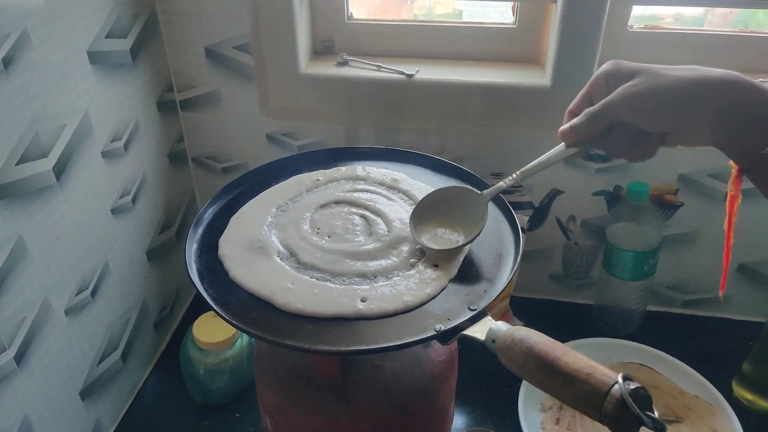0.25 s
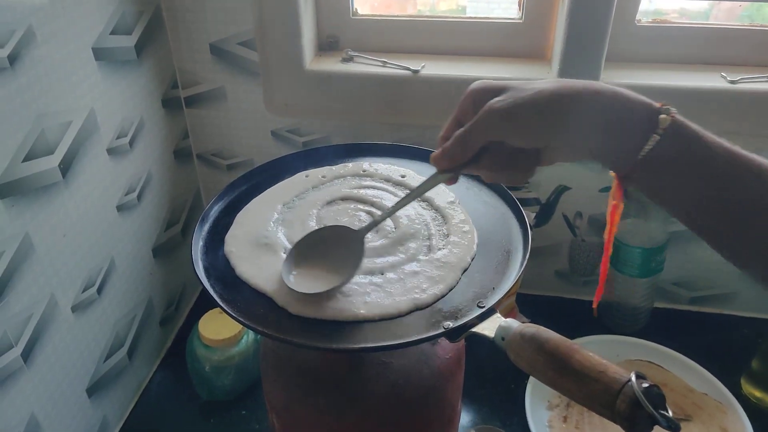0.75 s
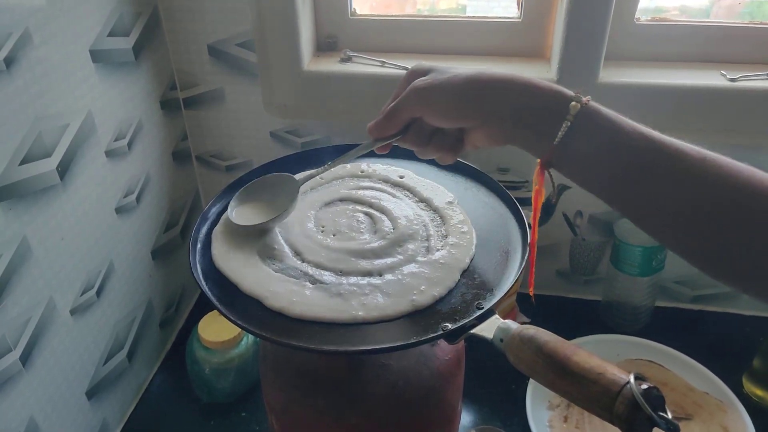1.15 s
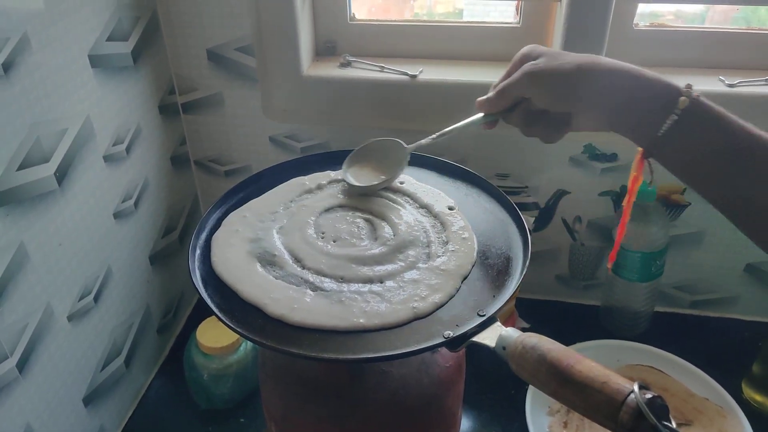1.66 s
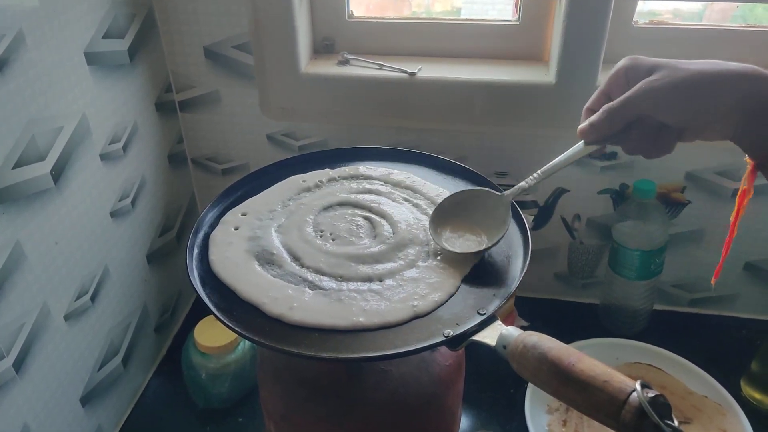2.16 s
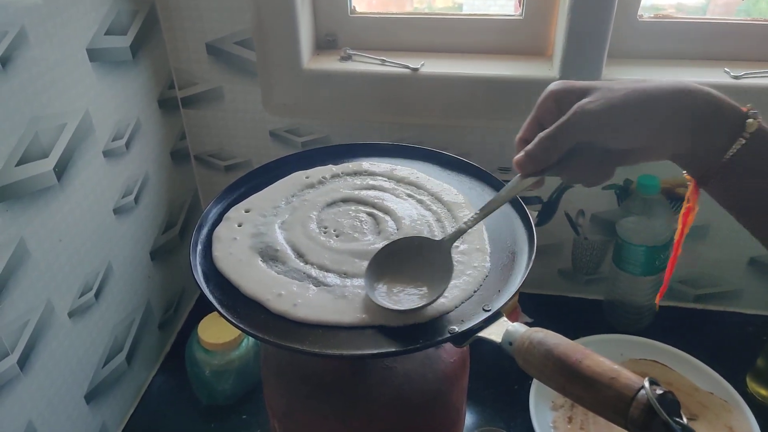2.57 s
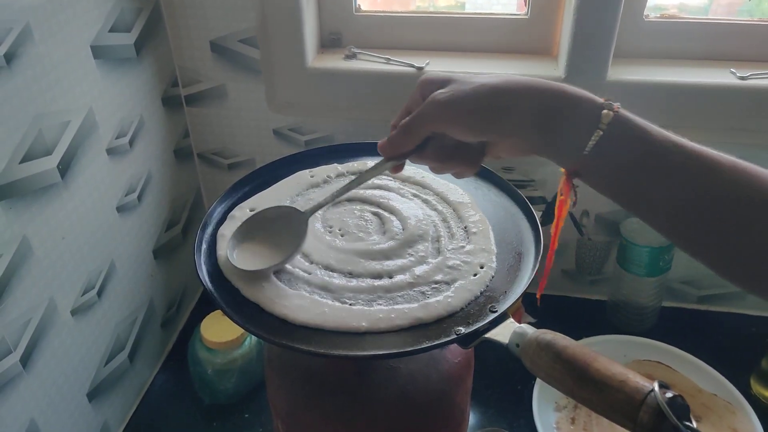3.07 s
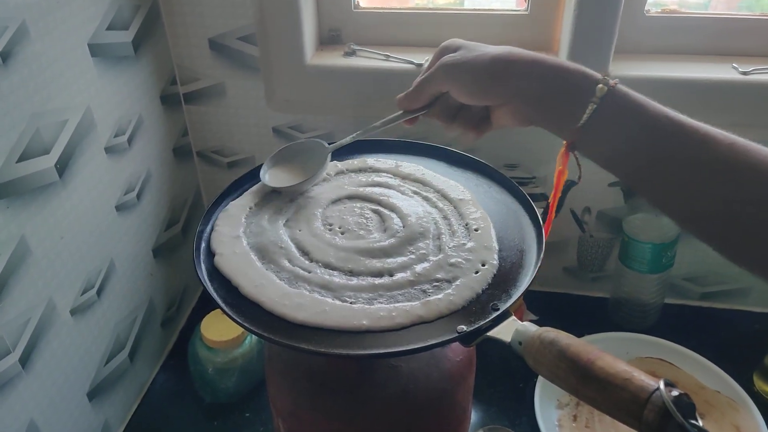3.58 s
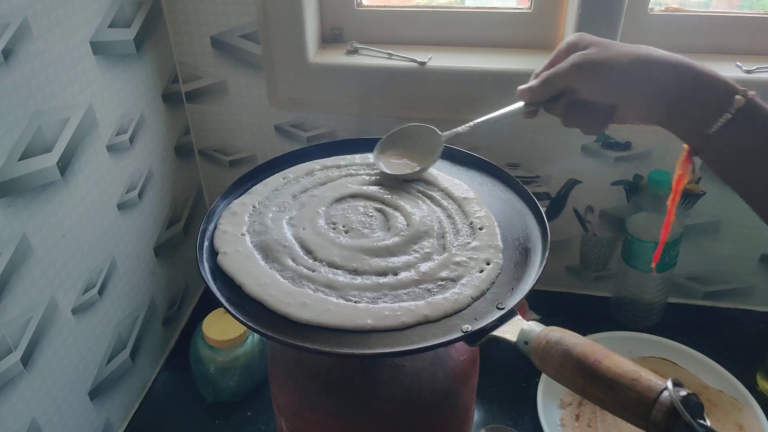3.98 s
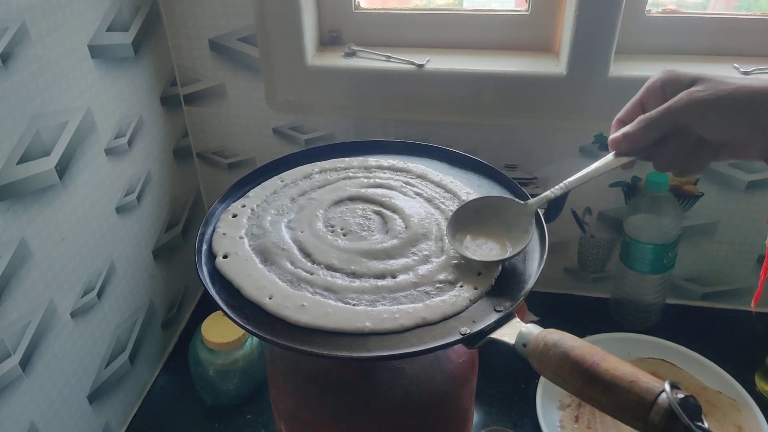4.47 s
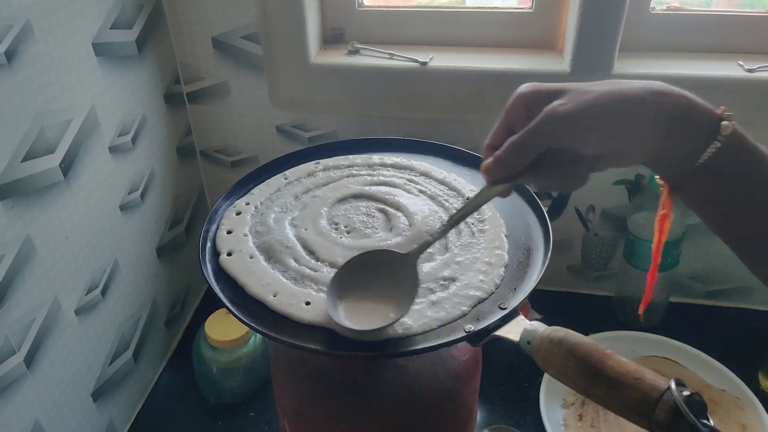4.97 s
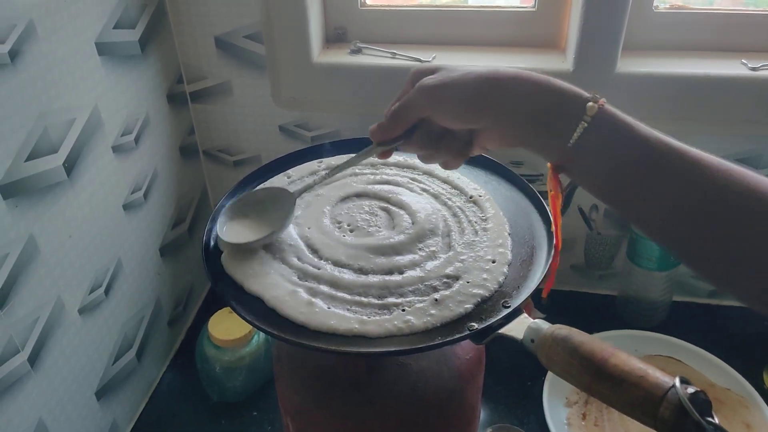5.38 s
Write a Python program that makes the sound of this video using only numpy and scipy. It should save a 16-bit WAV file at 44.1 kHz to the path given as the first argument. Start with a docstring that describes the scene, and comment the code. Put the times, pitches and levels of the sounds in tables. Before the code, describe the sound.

Steady crisp frying hiss swells and dips as batter is spread in circles, with faint ladle scrapes, tiny spits and a low griddle judder.

```python
"""Batter on a hot griddle

In a small kitchen, batter sizzles while a steel ladle spreads it in circles. Random bursts in four pitch
ranges, over hissing noise, make the steam bubbles; wet batter on bare iron brings surges, then bright jets.
Blisters spit as short puffs of noise. The ladle rubs, squeaks and smears as clicks and wavering tones, and
twice sets the griddle juddering on the stove through resonators. A low rumble of filtered noise lies behind."""
import sys
import numpy as np
from scipy.fft import rfft, irfft
from scipy.io import wavfile
from scipy.ndimage import map_coordinates

SR = 44100
rng = np.random.default_rng(int(sys.argv[2]) if len(sys.argv) > 2 else 0)


def file_out(sig):
    """Save sig as 16-bit WAV at sys.argv[1]."""
    # one column per channel
    cols = np.atleast_2d(sig).T
    # limit, then scale
    lim = np.clip(cols, -1, 1)
    pcm = np.round(lim * 32767).astype(np.int16)
    wavfile.write(sys.argv[1], SR, pcm)


N = 248503
TIME = np.arange(N) / SR   # s
FFT_SIZE = 2 ** 19
HZ = np.maximum(np.fft.rfftfreq(FFT_SIZE, 1 / SR), 1)

# How hard the batter fries: t/s, sizzle level/dB
FRYING = [(0.0, -33), (0.47, -33.5), (0.62, -29.5), (0.84, -34.5), (1.18, -40.5), (1.48, -37.5),
          (1.62, -42), (1.76, -35), (1.96, -34.5), (2.37, -29.5), (2.59, -31.5), (2.74, -28.5),
          (3.1, -37.5), (3.17, -34), (3.34, -36), (4.01, -33.5), (4.74, -36), (4.77, -32.5), (5.01, -28),
          (5.38, -37.5), (5.55, -37), (5.6, -44)]
# Frequencies that part the bubble sizes, large to fine: f/Hz
SIZE_EDGES_HZ = [3000, 4300, 6000]
# Bubbles, large to fine spray: level/dB against the sizzle, share of the frying swing followed,
# share of a surge (negative sinks), loss under a smear/dB, steam level/dB against the shared bursts
BUBBLE_SIZES = [(-9.5, 0.93, -0.34, 1, 2.5), (-8.5, 0.99, 0.95, 3, 1), (-2.5, 1.02, -0.28, 0.5, -0.5),
                (-6.5, 0.79, 0.2, 6.5, -4)]
# Once a circle the ladle pushes wet batter on to bare iron: t/s, length/s, swell/dB before each size's
# share, wait for the steam jet/s, jet level/dB
SURGES = [(0.487, 0.25, 5.5, 0.14, -34.5), (2.64, 0.15, 3, 0.084, -35), (4.794, 0.22, 4, 0.25, -40.5)]
STEADY_DB = -33   # sizzle at an ordinary pace
SURGE_EDGE_S = 0.096   # the bubbles swell gently
SMOTHER_LAG_S, SMOTHER_S, SMOTHER_EDGE_S = 0.13, 0.13, 0.04   # a smear soon seals the pores


def sizzle(bursts_per_s=6500, spread_db=3.0, own_db=-4.0, flutter_db=0.41, own_flutter_db=0.59, wander_db=0.42):
    """Steam bubbles burst all round the batter's edge over a hiss; harder frying means more of them."""
    frying_db = np.interp(TIME, *np.transpose(FRYING))
    swing = frying_db - STEADY_DB + wander_db * drift(18)
    surge = sum(db * pressed(s, length, SURGE_EDGE_S) for s, length, db, *jet in SURGES)
    smothered = sum(pressed(s + SMOTHER_LAG_S, SMOTHER_S, SMOTHER_EDGE_S) for s, length, db in SMEARS)

    per_s = bursts_per_s * from_db(swing - swing.mean())
    evened = np.sqrt(per_s.mean() / per_s)   # crowding alone does not raise the level
    shared_bursts = evened * np.array([grains(per_s, spread_db) for channel in range(2)])
    steam = rng.standard_normal((2, N))
    colour = sizzle_colour()

    # each size of bubble sounds in its own range, the smaller the higher and crisper
    above_edge = [1] + [1 / (1 + (edge / HZ) ** 24) for edge in SIZE_EDGES_HZ] + [0]
    out = 0
    for k, (size_db, follows, surges, lost_db, steam_db) in enumerate(BUBBLE_SIZES):
        own_bursts = evened * np.array([grains(per_s / 2, spread_db) for channel in range(2)])
        fizz = shared_bursts + from_db(own_db) * own_bursts + from_db(steam_db) * steam
        band = above_edge[k] - above_edge[k + 1]
        bubbles = rms_one(filtered(fizz, colour * band))
        level = STEADY_DB + size_db + follows * swing + surges * surge - lost_db * smothered
        out = out + bubbles * from_db(level + own_flutter_db * drift(35))
    return out * from_db(flutter_db * drift(70))   # bubbles come in clusters


# Colour of the bursts: f/Hz, relative level/dB per Hz
SIZZLE = [(250, -46.5), (700, -22), (1300, -18), (2250, -8.5), (3100, -6), (3650, -5), (4270, -10.5),
          (4800, -4), (5100, -2.5), (5900, -12.5), (8000, -14.5), (12600, -18), (14400, -16)]
# Where the sizzle sits between the microphones: f/Hz, left minus right level/dB
SIZZLE_PAN = [(1200, 5), (2400, 1.2), (3200, 3), (4300, 3), (4850, 4.5), (5500, -3), (6200, -3), (7400, 0),
              (9500, 3), (12500, 1), (15000, 0.5)]
# Thin rings that the bursts draw from the iron plate: f/Hz, width/Hz, level/dB against the plain sizzle
PLATE = [(790, 40, -2), (1054, 27, 2), (1201, 18, 3), (1415, 22, 1), (1510, 110, -1), (1973, 48, -3),
         (2659, 60, -4), (3440, 55, -4), (3940, 40, -2), (4829, 50, -3)]
# Reflections from the tiled corner and window: delay at left t/s, delay at right t/s, level/dB
ECHOES = [(.0037, 0.0034, -20), (.0069, 0.0053, -10), (0.0102, 0.0093, -12), (0.0162, 0.02, -9)]


def sizzle_colour(wall_cut_hz=5500):
    """Left and right response to a burst: broad humps, the plate's thin rings and the near walls."""
    rings = sum(from_db(db) ** 2 / (1 + (2 * (HZ - hz) / width) ** 2) for hz, width, db in PLATE)
    echoes = 0
    for left, right, db in ECHOES:
        delay = np.array([[left], [right]])
        echoes = echoes + from_db(db) * np.exp(-2j * np.pi * HZ * delay)
    walls = 1 + echoes / (1 + (HZ / wall_cut_hz) ** 2)   # the spread-out source blurs the highest echoes
    return from_db(at_hz(SIZZLE)) * np.sqrt(1 + rings) * walls * panned(at_hz(SIZZLE_PAN))


# Colour of the steam jets: f/Hz, relative level/dB per Hz
JET = [(5000, -28), (9000, -2), (13000, -2), (15000, 1)]
JET_S = 0.13   # length of a jet


def jets():
    """Late in a surge or just after it, trapped steam escapes through pinholes in a very bright hiss."""
    hiss = rms_one(filtered(rng.standard_normal((2, N)), from_db(at_hz(JET))))
    releases = [(s + wait, JET_S, db) for s, length, swell_db, wait, db in SURGES]
    return hiss * strokes(releases, edge_s=0.036)


# Large blisters that spit: t/s, starting level/dB before the overall SPIT_DB
SPITS = [(3.1887, -11), (5.096, -17), (5.163, -13), (5.28, -15), (5.395, -17)]
SPIT_DB = -6   # applied to large and small spits alike
SPIT_S = 0.001   # time for a puff to fall to 1/e
SPIT_LOW_HZ, SPIT_HIGH_HZ = 3800, 8000
SMALL_SPITS_PER_S, SMALL_SPIT_DB, SMALL_SPIT_SPREAD_DB = 4, -21, 1   # levels before SPIT_DB


def spits():
    """A blister lets its steam go in a bright puff of about a millisecond; small ones come at random."""
    brightness = np.sqrt((1 + (SPIT_LOW_HZ / HZ) ** 4) * (1 + (HZ / SPIT_HIGH_HZ) ** 2))
    colour = sizzle_colour() / brightness
    age = TIME[:400]
    sizes = SMALL_SPIT_DB + SMALL_SPIT_SPREAD_DB * rng.standard_normal(N)
    starts = np.flatnonzero(rng.random(N - len(age)) < SMALL_SPITS_PER_S / SR)
    small = [(TIME[i], sizes[i]) for i in starts]

    envelope = np.zeros((2, N))
    for s, db in list(SPITS) + small:
        start = round(s * SR)
        envelope[:, start:start + len(age)] += from_db(db) * np.exp(-age / SPIT_S)
    puffs = envelope * rng.standard_normal((2, N))
    return from_db(SPIT_DB) * filtered(puffs, unit_power(colour))


# Ladle rubbing on the iron: t/s, length/s, scrape level/dB
RUBS = [(0.51, 0.29, -48), (0.93, 0.29, -52.5), (1.28, .28, -54)]
# Ladle's bowl catching and squeaking: t/s, length/s, scrape level/dB, sung tone level/dB
CATCHES = [(0.572, 0.018, -42.5, -51), (0.62, 0.015, -36, -47), (0.667, 0.025, -45, -51),
           (0.903, 0.022, -44.5, -42.5), (0.936, 0.012, -46, -42), (0.98, 0.0075, -35.5, -47),
           (1.32, .052, -49.5, -49)]
# What the batter-damped griddle rings with: f/Hz, width/Hz, relative level/dB
GRIDDLE = [(276, 78, -12.5), (438, 30, -3), (563, 110, -9), (812, 84, -3), (997, 65, -2.5),
           (1190, 190, -7.5)]
# Wet batter smeared under the ladle: t/s, length/s, level/dB
SMEARS = [(1.402, 0.24, -41)]
# Colour of the smear: f/Hz, relative level/dB per Hz
SMEAR_COLOUR = [(1500, -16.5), (2050, -2), (2500, 0), (3000, -0.5), (4200, -6), (7000, -33)]
SQUEAK_HZ = 822


def ladle(pan_db=4.5):
    """The ladle's bowl catches and slips on the iron, and squeezes wet batter out from under itself."""
    rub = scrape(RUBS, GRIDDLE, per_s=1400, spread_db=0.0, edge_s=0.075)
    rub += scrape(CATCHES, GRIDDLE, per_s=1600, spread_db=-1.0, edge_s=0.0071)
    sung_rows = [(s, length, db) for s, length, scrape_db, db in CATCHES]
    squeak = sung(SQUEAK_HZ, waver=0.0388) * strokes(sung_rows, edge_s=0.0052)
    squish = np.array([grains(per_s=3500, spread_db=1.5) for channel in range(2)])
    smear = rms_one(filtered(squish, from_db(at_hz(SMEAR_COLOUR)))) * strokes(SMEARS, edge_s=0.037)
    return kitchen((rub + squeak) * panned(pan_db), wet_db=-3.0) + smear * panned(1.0)


# Griddle juddering on its support: t/s, length/s, chatter level/dB, sung tone level/dB, tone f/Hz
JUDDERS = [(3.799, 0.055, -49, -56, 170), (3.858, 0.095, -51, -53.5, 163), (4.02, 0.035, -54.5, -61, 165),
           (4.937, 0.194, -52.5, -53, 250)]
# Resonances of the stove frame: f/Hz, width/Hz, relative level/dB
STOVE = [(164, 16.3, 3.5), (205, 9, 0), (249.6, 14, 0), (354, 90, -10), (532, 29, -6), (620, 13.3, -11)]
HUM_HZ, HUM_DB, HUM_T60_S = 201, -8, 3.5   # frame's hum; dB against the chatter, before build-up
HUM_BUILD_S = 0.17   # shorter judders leave less hum


def judder(pan_db=4.5):
    """Dragged by the ladle, the griddle chatters and sings on the stove, whose frame hums on and dies away."""
    thrum = scrape(JUDDERS, STOVE, per_s=600, spread_db=2.1, edge_s=0.0075)
    for s, length, chatter_db, tone_db, hz in JUDDERS:
        thrum += from_db(tone_db) * pressed(s, length, edge_s=0.0077) * sung(hz, waver=0.0078)
        build = np.clip(TIME - s, 0, length) / HUM_BUILD_S
        decay = from_db(-60 * np.maximum(TIME - s - length, 0) / HUM_T60_S)
        thrum += from_db(chatter_db + HUM_DB) * build * decay * sung(HUM_HZ, waver=0.0084)
    return kitchen(thrum * panned(pan_db), wet_db=-10)


# Background rumble: f/Hz, relative level/dB per Hz
RUMBLE = [(12, -7.5), (22, 10), (31, -6), (45, -0.5), (62, -6.5), (85, 0), (103, -17), (140, -13),
          (220, -19.5), (340, -21), (600, -16), (1200, -16), (3000, -43)]
# Faint resonances in the background: f/Hz, width/Hz, relative level/dB
DRONE = [(163.2, 8.8, -7), (272.2, 4.3, -4.5), (294.2, 3, -5.5), (433, 23, -1), (806, 29, -9.5)]
RUMBLE_DB, DRONE_DB = -51, -62


def background(pan_db=5.0, apart_hz=1100, least_apart=0.022):
    """Steady noise makes a low rumble and a faint drone, alike at both microphones only in the bass."""
    mid, side = rng.standard_normal((2, N))
    side = filtered(side, np.minimum(HZ / apart_hz + least_apart, 1))
    air = (mid + side * [[1], [-1]]) * panned(pan_db)
    rumble = rms_one(filtered(air, from_db(at_hz(RUMBLE))))
    drone = rms_one(filtered(air, resonances(DRONE)))
    return from_db(RUMBLE_DB) * rumble + from_db(DRONE_DB) * drone


KITCHEN_T60_S = 0.23   # time for the room to fall 60 dB


def kitchen(x, wet_db):
    """The small room adds a short diffuse tail, different at each microphone."""
    tail = rng.standard_normal((2, N)) * from_db(-60 * TIME / KITCHEN_T60_S) * (TIME > 0.004)
    tail /= np.sqrt(np.sum(tail ** 2, axis=1)[:, None])
    return filtered(x, 1 + from_db(wet_db) * rfft(tail, FFT_SIZE))


def scrape(rows, modes, per_s, spread_db, edge_s):
    """Uneven slips of friction ring the modes of the body."""
    slips = grains(per_s, spread_db) * strokes(rows, edge_s)
    return filtered(slips, unit_power(resonances(modes)))


def sung(hz, waver, flutter_db=4.0):
    """Where the friction locks on to a mode, it sings a wavering tone; rms 1."""
    clock = np.cumsum(1 + waver * drift(90)) / SR
    return rms_one(np.sin(2 * np.pi * hz * clock) * from_db(flutter_db * drift(80)))


def strokes(rows, edge_s):
    """Pressure of a series of contacts: t/s, length/s, level/dB; further columns are ignored."""
    return sum(from_db(db) * pressed(s, length, edge_s) for s, length, db, *rest in rows)


def pressed(s, length, edge_s):
    """One contact from 0 to about 1 and back, easing in and out."""
    return (np.tanh((TIME - s) / edge_s) - np.tanh((TIME - s - length) / edge_s)) / 2


def grains(per_s, spread_db):
    """Random clicks of either sign, their levels scattered exponentially in dB; rms 1."""
    sizes = from_db(spread_db * np.minimum(rng.exponential(1, N), 5))
    return rms_one(sizes * rng.choice([-1, 1], N) * (rng.random(N) < per_s / SR))


def resonances(modes):
    """Response of parallel resonators with alternating signs."""
    response = 0
    for k, (hz, width, db) in enumerate(modes):
        detuning = (HZ ** 2 - hz ** 2) / (HZ * width)
        response = response + (-1) ** k * from_db(db) / (1 + 1j * detuning)
    return response


def drift(rate):
    """Smooth chance with rms 1, from random knots at this rate per second."""
    knots = rng.standard_normal(4000)
    return rms_one(map_coordinates(knots, [TIME * rate], order=2, mode="wrap"))


def from_db(db):
    """Amplitude factor for a level in dB."""
    return 10 ** (np.asarray(db) / 20)


def rms_one(x):
    """Scales a sound so that the mean of its channels has rms 1."""
    return x / np.sqrt(np.mean(np.atleast_2d(x).mean(axis=0) ** 2) + 1e-20)


def unit_power(response):
    """Scales a response to a mean power gain of 1."""
    return response / np.sqrt(np.mean(abs(response) ** 2))


def at_hz(points):
    """A table of f/Hz and value joined by lines over log frequency."""
    hz, value = np.transpose(points)
    return np.interp(np.log(HZ), np.log(hz), value)


def filtered(x, response):
    """Applies a frequency response."""
    return irfft(rfft(x, FFT_SIZE) * response)[..., :N]


def panned(db):
    """Left and right gains for a level difference, left minus right."""
    return from_db(np.array([[0.5], [-0.5]]) * db)


def scene():
    """Everything at the stove, over the background."""
    return sizzle() + jets() + spits() + ladle() + judder() + background()


CUTOFF_HZ = 15730


def record(dry):
    """The top is cut steeply."""
    return filtered(dry, 1 / np.sqrt(1 + (HZ / CUTOFF_HZ) ** 1000))


dry = scene()
out = record(dry)
file_out(out)
```